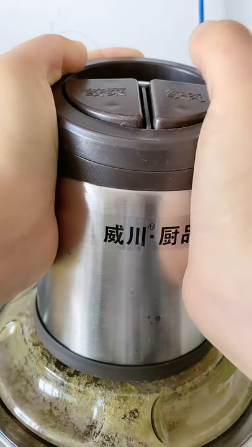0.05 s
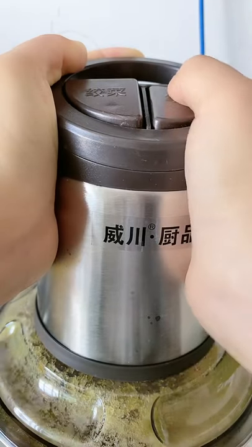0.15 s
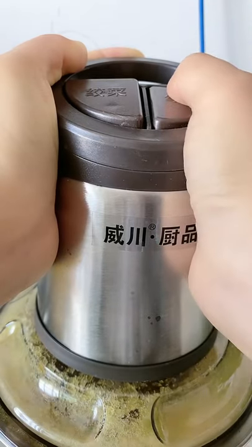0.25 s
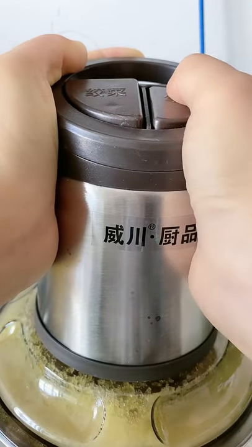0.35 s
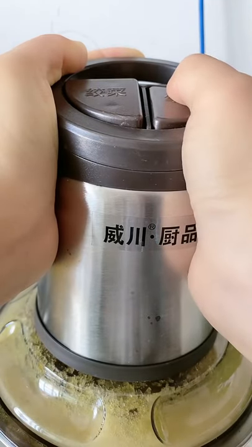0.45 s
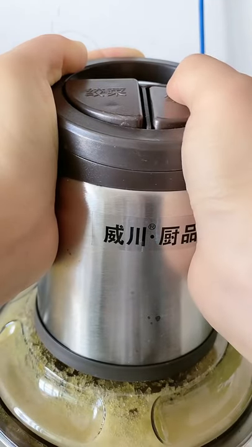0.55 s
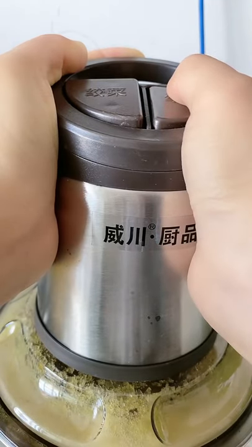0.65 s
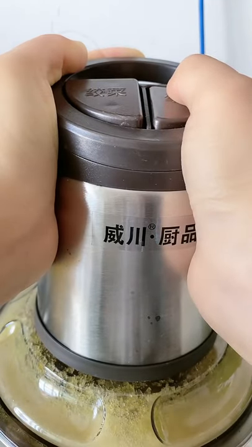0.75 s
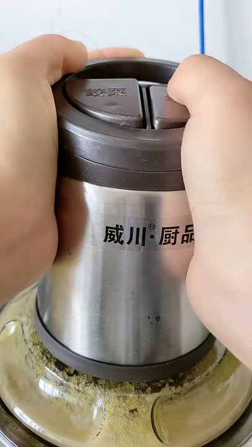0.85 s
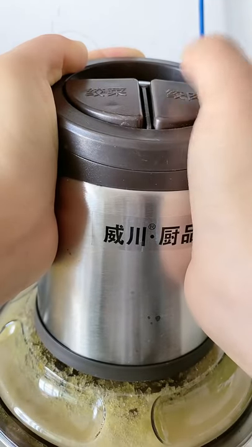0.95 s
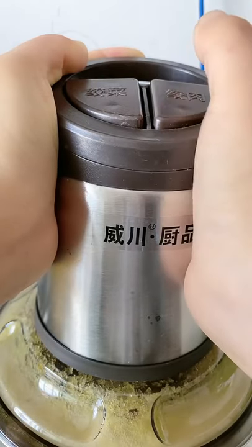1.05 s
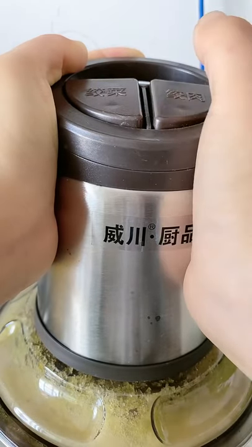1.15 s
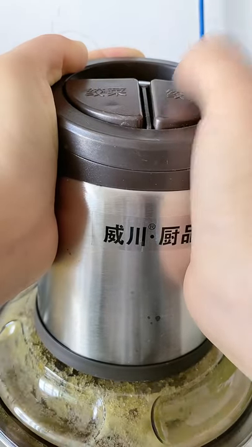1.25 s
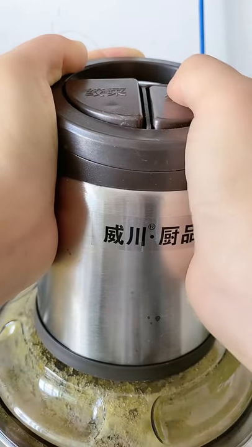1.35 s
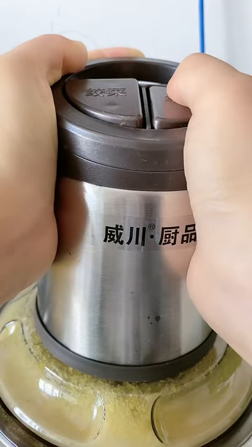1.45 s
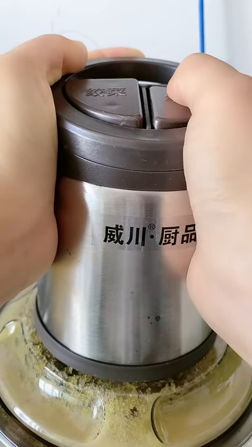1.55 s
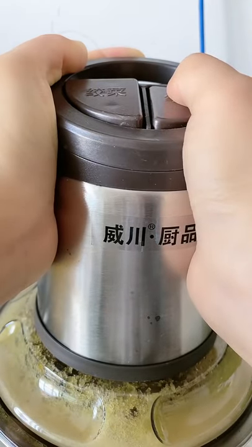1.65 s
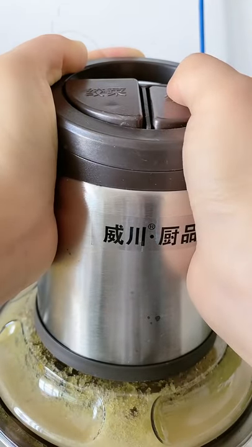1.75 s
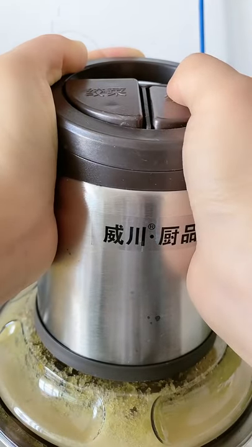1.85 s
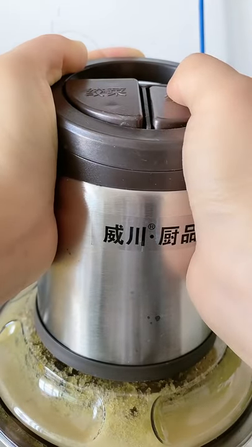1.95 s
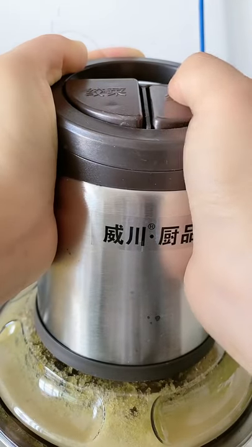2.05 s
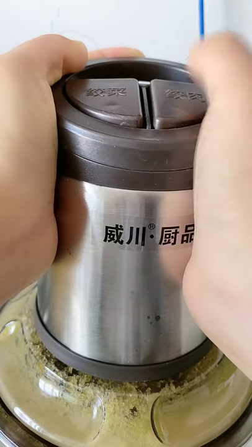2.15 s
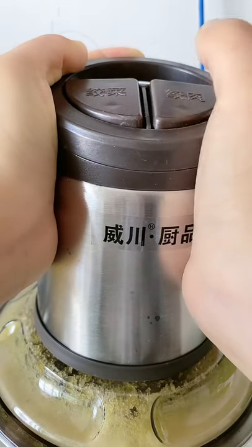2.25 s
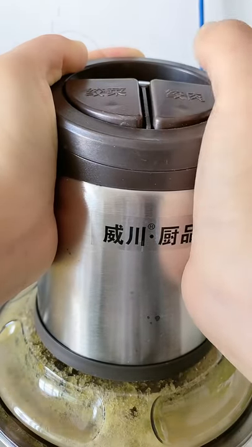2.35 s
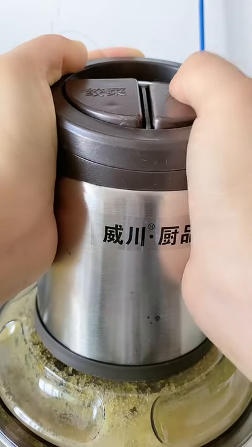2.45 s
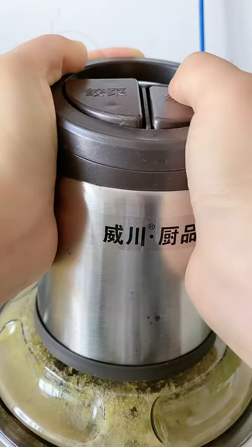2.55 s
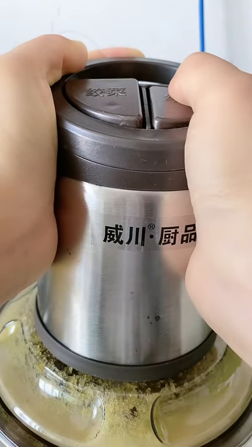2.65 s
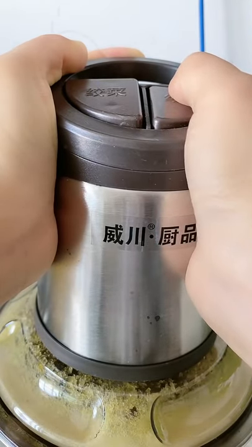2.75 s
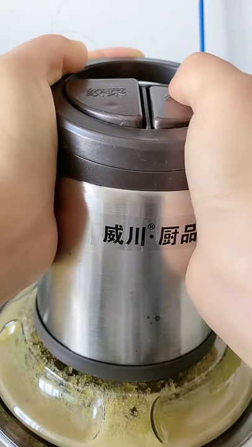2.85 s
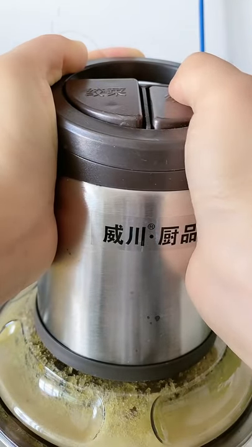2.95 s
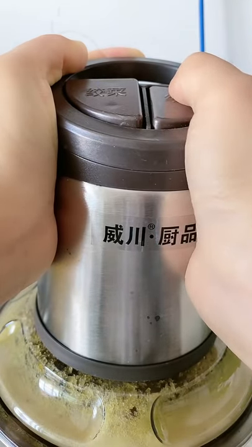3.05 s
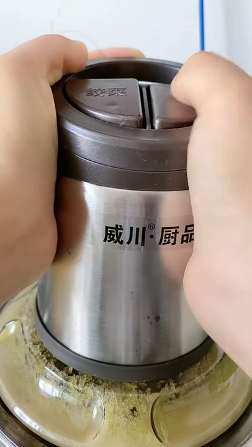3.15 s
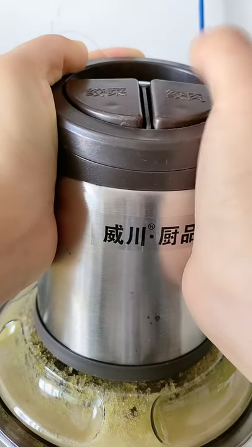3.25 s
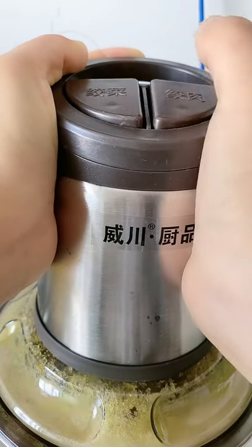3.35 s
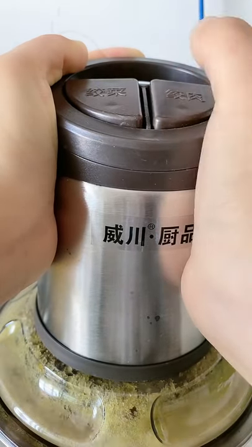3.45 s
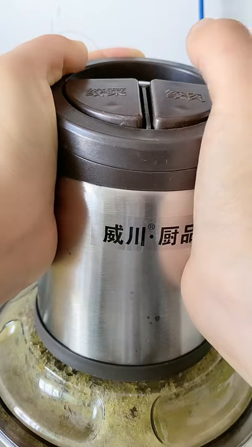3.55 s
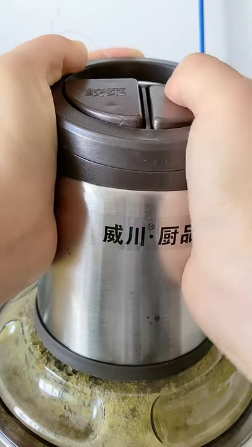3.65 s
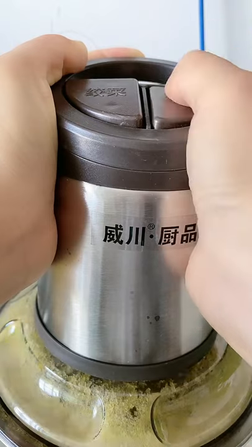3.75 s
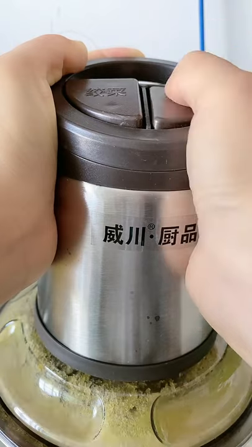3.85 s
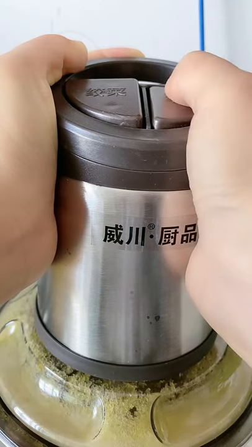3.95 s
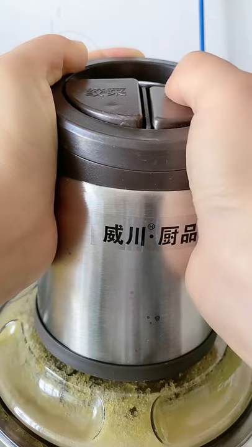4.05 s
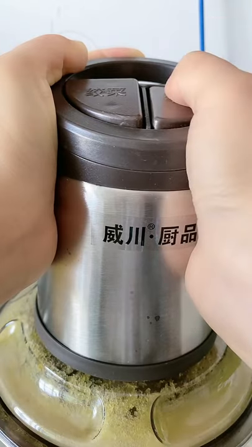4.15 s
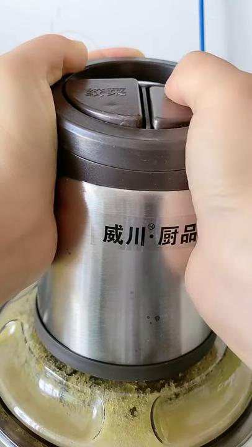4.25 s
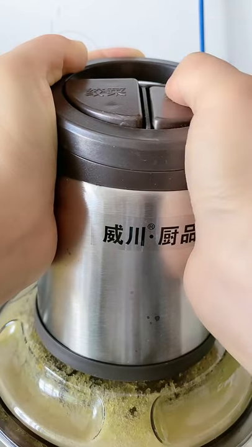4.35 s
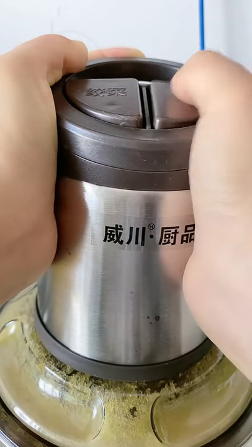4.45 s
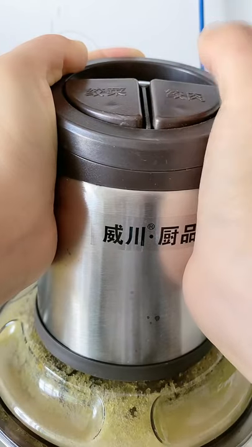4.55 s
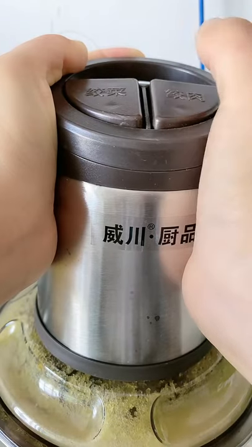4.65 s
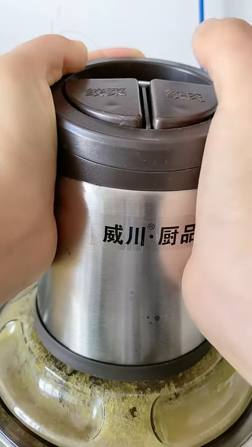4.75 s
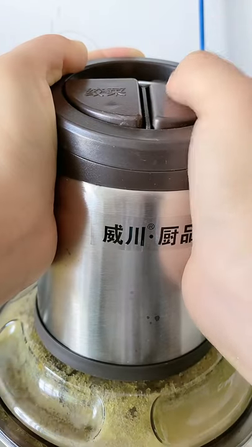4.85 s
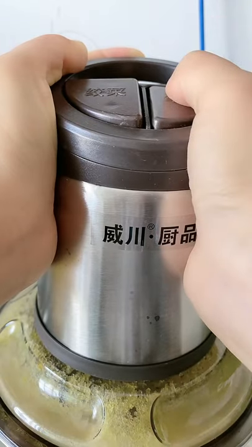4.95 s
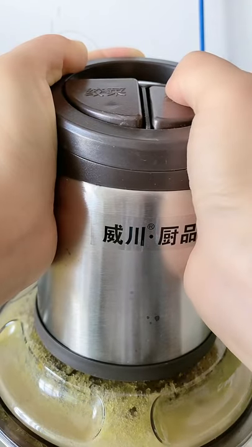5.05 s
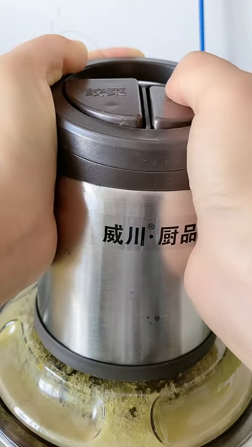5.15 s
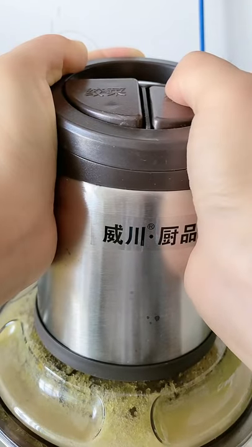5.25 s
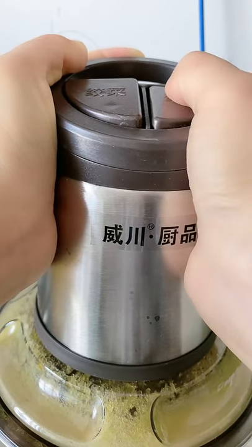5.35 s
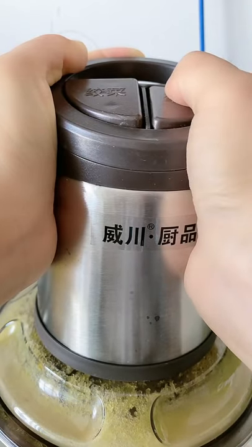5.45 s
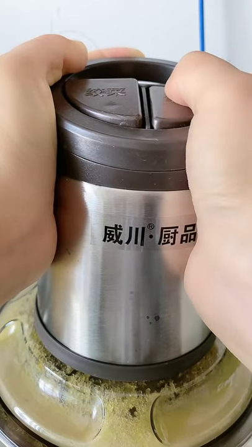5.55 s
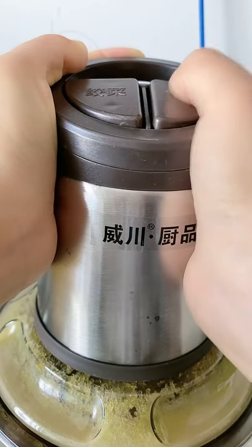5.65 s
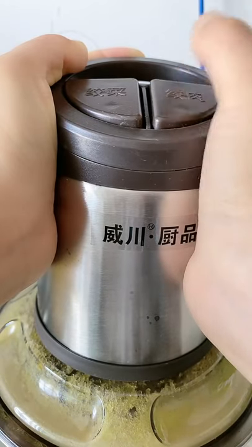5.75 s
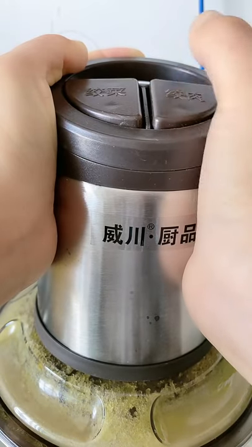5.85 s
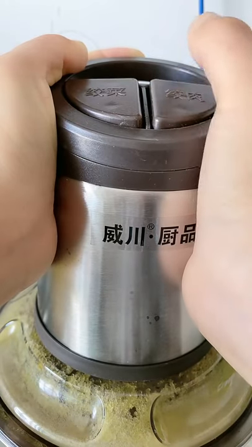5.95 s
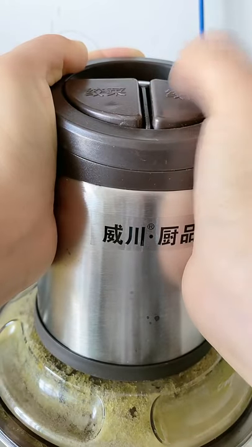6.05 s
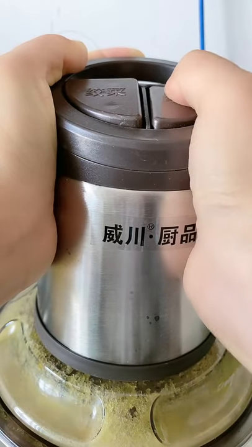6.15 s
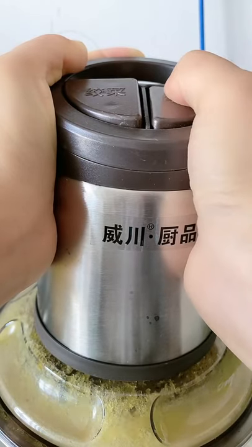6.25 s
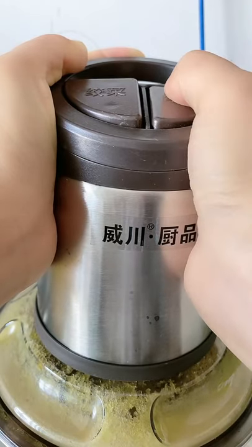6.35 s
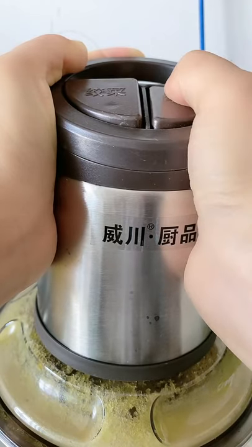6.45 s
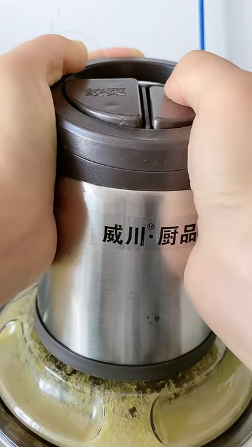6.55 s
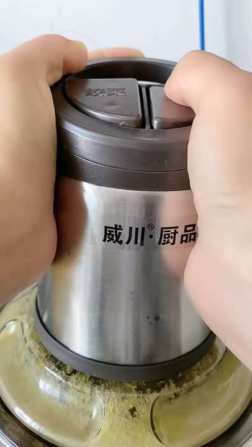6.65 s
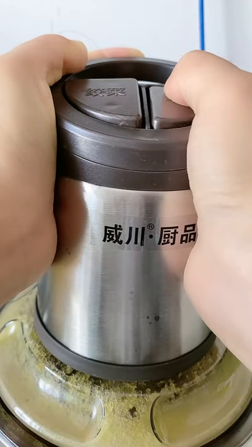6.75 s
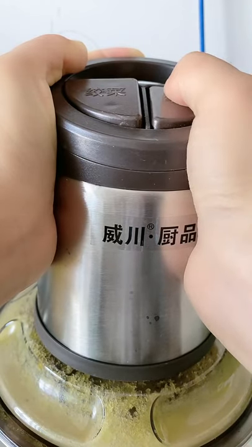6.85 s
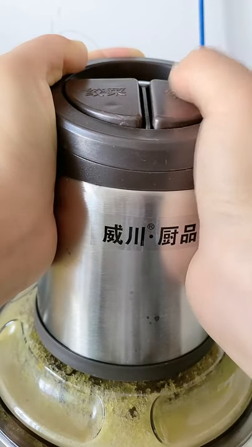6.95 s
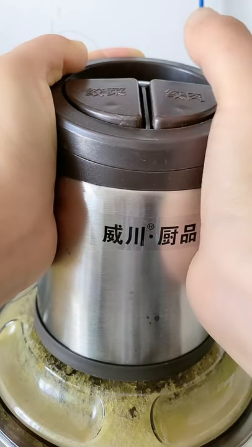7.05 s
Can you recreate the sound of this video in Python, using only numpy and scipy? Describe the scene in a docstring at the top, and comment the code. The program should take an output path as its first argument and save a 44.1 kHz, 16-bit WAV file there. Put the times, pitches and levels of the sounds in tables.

```python
"""An electric chopper crushes hard, brittle pieces in its glass bowl on a kitchen counter.
It is first heard coasting from an earlier press, then pulsed six times, each a run-up and a coast.
The unbalanced rotor shakes at shaft speed, gear tones excite shell resonances and random thumps excite the body.
Filtered random grains make chips rattle the lid and hiss on the glass, densest at speed.
During and after the presses, clicks with dying noise make the jolts, the cracks of larger pieces and the knocks."""
import sys
import numpy as np
from scipy import signal
from scipy.fft import rfft, irfft
from scipy.io import wavfile
from scipy.ndimage import uniform_filter1d

SR = 44100
rng = np.random.default_rng(int(sys.argv[2]) if len(sys.argv) > 2 else 0)


def int16_out(signal):
    """Quantize to a 16-bit WAV file."""
    q = np.round(np.clip(np.atleast_2d(signal).T, -1, 1) * 32767)
    wavfile.write(sys.argv[1], SR, q.astype(np.int16))


N = 313551
T = np.arange(N) / SR

# button held: (on [s], off [s], speed aimed at by the release [turns/s], time constant of the coast [s])
PRESSES = [(.211, .98, 333, .282), (1.37, 2.19, 342, .291), (2.524, 3.275, 343, .337),
           (3.722, 4.567, 348, .318), (4.932, 5.74, 359, .411), (6.174, 7.03, 362, .42)]
# spectrum of the glass under the chips: (frequency [Hz], level [dB])
GLASS = [(800, -35), (2300, -20), (3300, -12), (4200, -7), (4900, -0.5), (5650, 5.5), (6300, 2.5),
         (7200, 1), (8300, -7), (9700, -20), (11500, -14), (13600, -19), (14200, -48), (16000, -45)]
SLACK_S = .02   # the rotor runs free this long before the gears catch


def from_db(db):
    """Level to amplitude: 20 dB is a factor of ten."""
    return 10 ** (np.asarray(db) / 20)


def rms_one(x):
    """Normalization: equal mean power for every signal, an rms of 1."""
    return x / np.sqrt(np.mean(x ** 2) + 1e-20)


def drift(rate):
    """Low-pass noise: a random curve of rms 1 whose spectrum falls off above rate [Hz]."""
    hz = np.arange(N // 2 + 1) * SR / N
    spectrum = rfft(rng.standard_normal(N)) / (1 + (hz / rate) ** 2)
    return rms_one(irfft(spectrum, N))


def turns(hz):
    """Phase [rad] is the running integral of the rate of rotation."""
    return 2 * np.pi * np.cumsum(hz) / SR


def response(spectrum, size=2048):
    """Minimum phase: folding the cepstrum gives the causal click response of a surface with this spectrum."""
    hz, db = np.transpose(spectrum)
    grid = np.maximum(np.arange(size // 2 + 1) * SR / size, 1)
    log_gain = np.log(from_db(np.interp(np.log(grid), np.log(hz), db)))
    cepstrum = irfft(log_gain)
    cepstrum[1:size // 2] *= 2
    cepstrum[size // 2 + 1:] = 0
    return irfft(np.exp(rfft(cepstrum)))


def through(x, impulse):
    """Linear filtering: convolution with an impulse response."""
    return signal.fftconvolve(x, impulse)[:N]


def resonate(x, modes):
    """Modal superposition: parallel two-pole resonances, each with its own gain at the peak."""
    out = 0
    for hz, width, db in modes:
        r = np.exp(-np.pi * width / SR)
        zeros = np.array([1, 0, -1]) * (1 - r * r) / 2
        poles = [1, -2 * r * np.cos(2 * np.pi * hz / SR), r * r]
        out = out + from_db(db) * signal.lfilter(zeros, poles, x)
    return out


def grains(per_s, spread_db):
    """Shot noise: random impacts of either sign, their levels spread exponentially up to 4 * spread_db."""
    sizes = from_db(spread_db * np.minimum(rng.exponential(1, N), 4))
    signs = rng.choice([-1, 1], N)
    hits = rng.random(N) < per_s / SR
    return sizes * signs * hits / np.sqrt(per_s)   # mean power independent of the rate


def blows(rows, crumble_db, size=4096):
    """Impulsive excitation: each (time [s], level [dB], decay [s]) is a click and a dying spray of noise."""
    out, age = np.zeros(N + size), np.arange(size) / SR
    for s, db, crumble_s in rows:
        burst = from_db(crumble_db) * rng.standard_normal(size) * np.exp(-age / crumble_s)
        burst[0] = 1
        at = max(round(s * SR), 0)
        out[at:at + size] += from_db(db) * burst
    return out[:N]


def by_press(values):
    """Piecewise-constant control: hold one value through each press and the coast after it."""
    starts = [on for on, *_ in PRESSES]
    return np.asarray(values)[np.maximum(np.searchsorted(starts, T) - 1, 0)]


def coast(hz, coast_s, age):
    """Rotor deceleration: viscous drag decays the speed exponentially, dry friction brings it to rest."""
    friction_hz = 79   # below this speed dry friction brakes more than drag does
    slowing = (hz + friction_hz) * np.exp(-np.maximum(age, 0) / coast_s)
    return np.maximum(slowing - friction_hz, 0)


def shaft_speed():
    """First-order run-up: each press pulls the rotor towards a slowly rising speed; on release it coasts."""
    spin_up_s = .113   # time constant of the run-up
    creep_hz_per_s = 20   # the motor gains speed as the load breaks up
    speed = coast(104.17, .27, T)   # still coasting from an earlier press
    for on, off, top_hz, coast_s, *_ in PRESSES:
        driven = np.clip(T, on, off)
        goal = top_hz - creep_hz_per_s * (off - driven)
        initial_hz = np.interp(on, T, speed)
        running = goal + (initial_hz - goal) * np.exp(-(driven - on) / spin_up_s)
        speed = np.where(T > on, coast(running, coast_s, T - off), speed)
    return speed


def engaged():
    """Gear coupling: 1 while the motor drives the blade, 0 while it coasts, with short ramps between."""
    driving = sum(1. * ((T > on + SLACK_S) & (T < off)) for on, off, *_ in PRESSES)
    return uniform_filter1d(driving, size=400)


def load_levels(speed, held, surge_db):
    """Load response: rumble follows speed; chips fly once the blade is driven, hardest while the motor labours."""
    # load at each pace of stirring, relative levels:
    # (speed [turns/s], rumble [dB], rattle [dB], hiss of fine chips [dB])
    load = [(10, -44, -62, -45), (30.6, -41, -44.5, -34.5), (58, -31, -41.5, -32.5), (93, -31, -31, -26),
            (126, -26.5, -30.5, -24), (220, -25.5, -28.5, -24), (324, -25, -27.5, -22.5)]
    # rises and sudden dips of the hiss: (time [s], level change [dB])
    hiss_change = [(.3, 0.5), (1.0, 2), (1.4, -1.5), (1.75, 1), (2.3, 1), (2.62, 1), (2.75, -2), (2.9, 0.5),
                   (3.82, -1.5), (3.89, -4), (4.1, 0), (4.7, 1), (5.3, -1), (5.63, 0.5), (5.7, -1.5),
                   (6.25, -3), (6.7, 1.5), (6.8, -4)]
    sway_per_s = 9.2   # the heap shifts at random
    pace, rumble_db, rattle_db, hiss_db = np.transpose(load)
    effort = held * np.clip(1 - speed / pace[-1], 0, 1)
    stir = speed + effort * pace[-1]
    surge = surge_db * effort
    change_db = np.interp(T, *np.transpose(hiss_change))
    shift = drift(sway_per_s)
    rumble_level = np.interp(speed, pace, rumble_db) + 1.0 * drift(sway_per_s)
    # the coarse chips share part of the surge of the fine ones
    rattle_level = np.interp(stir, pace, rattle_db) + 0.42 * surge + 0.2 * shift
    hiss_level = np.interp(stir, pace, hiss_db) + surge + 1.02 * shift + change_db
    return rumble_level, rattle_level, hiss_level


def motor(speed, held, rotor_db, sweep_db):
    """Rotating unbalance shakes the housing once a turn, two blades sweep the load, windings hum under current."""
    # shake of the unbalanced rotor, before the change for each press: (speed [turns/s], level [dB])
    unbalance = [(100, -65), (260, -38), (298, -31.5), (325, -29.5), (341, -26.8), (350, -22), (361, -18)]
    shake_db = np.interp(speed, *np.transpose(unbalance)) + rotor_db
    shake = from_db(shake_db + .7 * drift(12))
    rotor = shake * np.sin(turns(speed * (1 + .002 * drift(15))))
    mains = turns(np.full(N, 50.))
    hum = held * from_db(-44 + 2 * drift(5)) * np.sin(2 * mains)
    # the gearbox turns the blades seven times slower than the rotor
    blade = turns(speed / 7)
    strokes = from_db(sweep_db) * np.sin(2 * blade) + from_db(-28) * np.sin(blade)
    sweep = shake * from_db(1.7 * drift(5)) * strokes
    return np.sqrt(2) * (rotor + hum + sweep)   # sines: rms to peak


def gears(speed, whine_db):
    """Gear-mesh excitation: tones tied to a stumbling shaft flare as they cross each shell resonance."""
    # mesh, its sidebands from the planet carrier, the sun's teeth:
    # (multiple of the shaft speed [1], relative level [dB])
    gear_tones = [(8.57, 0), (8.14, -9), (8.43, -8), (8.71, -10), (9.0, -10), (10.0, -13)]
    # gearbox shell: (frequency [Hz], width [Hz], level [dB])
    shell_modes = [(1086, 165, -1.5), (1897, 210, -2.5), (2637, 52, -0.5), (2810, 220, -4), (3360, 120, -3)]
    shaft = turns(speed * (1 + .005 * drift(60)))
    teeth = 0
    for order, db in gear_tones:
        tone = np.sin(order * shaft + rng.uniform(0, 2 * np.pi))
        teeth = teeth + from_db(db + 2.0 * drift(130)) * tone
    # loose teeth chatter, which smears the mesh tone into a band
    chatter = from_db(-0.5) * drift(240) * np.sin(gear_tones[0][0] * shaft)
    force = (teeth + chatter) * np.clip(speed / 170, 0, 1) ** 2 * from_db(whine_db)
    # the shell's panels swing with or against each other
    signs = [1, -1, 1, -1, -1]
    return sum(sign * resonate(force, [mode]) for sign, mode in zip(signs, shell_modes))


def rumble(level_db):
    """Random excitation of modes: the tumbling load thumps the housing and counter."""
    # housing and counter: (frequency [Hz], width [Hz], relative level [dB])
    body_modes = [(106.3, 10, -11), (151, 26, -12.5), (181.1, 19.6, 5), (202, 45, -7.5), (301.5, 55, -1.5),
                  (359.3, 11.8, 2.5), (399, 6.1, -15)]
    thumps = resonate(grains(900, spread_db=0.5), body_modes)
    edges = signal.butter(4, [90, 440], "band", fs=SR, output="sos")
    return from_db(level_db + 1.62) * rms_one(signal.sosfilt(edges, thumps))


def chips(speed, rattle_db, hiss_db):
    """Filtered shot noise: coarse chips rattle the lid, fine ones hiss on glass, in clumps, more often at speed."""
    # spectrum of lid and bowl under the rattle: (frequency [Hz], relative level [dB])
    rattle_spectrum = [(60, -22), (300, -18.5), (620, 2.5), (780, -3.5), (1100, 2.5), (1550, -0.5),
                       (1700, -2.5), (1850, 3.5), (2050, -5), (2400, -5), (2750, -3.5), (3300, -7),
                       (4500, -7.5), (9000, -64)]
    per_s = 1200 + 16 * speed
    clumps = drift(133)
    coarse_hits = grains(per_s * .5, spread_db=0.5) * from_db(1.6 * clumps)
    coarse = rms_one(through(coarse_hits, response(rattle_spectrum)))
    fine = 0
    for tilt_db in (-4, 0, 4):   # per octave: big, middling and small chips, from dull to bright
        colour = [(hz, db + tilt_db * np.log2(hz / 6500)) for hz, db in GLASS]
        fine_hits = grains(per_s * .4, spread_db=0.0) * from_db(2.2 * clumps)
        fine = fine + rms_one(through(fine_hits, response(colour)))
    return from_db(rattle_db - 1.5) * coarse + from_db(hiss_db - 1.53) * rms_one(fine)


def air():
    """Stationary coloured noise: the steady sound of the room air."""
    # spectrum of the room air: (frequency [Hz], relative level [dB])
    air_spectrum = [(20, -37), (45, -0.5), (100, -7), (200, -28), (500, -13), (2000, -15.5), (15000, -19.5)]
    return from_db(-44.5) * rms_one(through(rng.standard_normal(N), response(air_spectrum)))


def impacts(jolt_db):
    """Impulse response: jolts and knocks ring the gearbox and lid; cracks ring the glass, muffled by the load."""
    # larger pieces cracking: (time [s], relative level [dB], decay of the splinters [s])
    crack_rows = [(.236, -6, 0.0066), (.246, -5, 0.003), (.965, -7.5, 0.0017), (1.069, -5, 0.0035),
                  (1.406, -9, .005), (1.628, -6.5, 0.0016), (1.766, -4, .0015), (1.987, -3.5, .0018),
                  (2.068, -3, 0.0019), (2.4287, -2, 0.0023), (2.544, -13, 0.0087), (2.668, -6.5, 0.0023),
                  (3.07, -4, .002), (3.172, -1.5, 0.001), (3.53, -9, 0.0033), (3.743, -5, 0.0026),
                  (3.747, -1.5, 0.0049), (3.798, -7, 0.0041), (3.8535, -4, 0.0014), (3.989, -7, 0.0047),
                  (4.429, -4, .001), (4.828, -7.5, 0.0045), (4.865, -6.5, 0.0034), (5.64, -7, .003),
                  (6.033, -5.5, 0.0055), (6.193, -9.5, 0.0044), (6.746, -4.5, 0.0023)]
    # the blade knocks on lumps: (time [s], relative level [dB])
    knock_rows = [(0.237, -15), (0.268, 0), (0.279, -10), (1.405, 0.5), (1.472, -1), (3.75, -3),
                  (4.831, -5.5), (4.952, -22), (5.87, -4), (6.045, -3)]
    # lid when struck: (frequency [Hz], width [Hz], level [dB])
    lid_modes = [(886, 450, 0), (1080, 120, 1.5), (1690, 78, -22)]
    jolt_s, knock_s = 0.026, 0.0021   # decay of the chatter
    jolt_rows = [(on + SLACK_S, db, jolt_s) for (on, *_), db in zip(PRESSES, jolt_db)]
    jolts = blows(jolt_rows, crumble_db=-6)
    knocks = blows([(s, db, knock_s) for s, db in knock_rows], crumble_db=-11)
    # the load damps the treble of a crack
    muffle = signal.butter(1, 3530, fs=SR, output="sos")
    glass = signal.sosfilt(muffle, response(GLASS))
    cracks = through(blows(crack_rows, crumble_db=-9.5), glass / np.abs(glass).max())
    return from_db(-2.5) * cracks + resonate(from_db(7.5) * jolts + from_db(12.5) * knocks, lid_modes)


def kitchen():
    """Diffuse reverberation: dense reflections from tiles and counter, dying exponentially."""
    t60_s = 0.21   # time to fall by 60 dB
    age = T[:SR // 2]
    tail = rng.standard_normal(len(age)) * from_db(-60 * age / t60_s) * (age > .003)
    tail = signal.sosfilt(signal.butter(2, 500, "high", fs=SR, output="sos"), tail)
    return tail / np.sqrt(np.sum(tail ** 2))


def scene():
    """Superposition: the direct sound of the chopper, a little reverberation and the room air."""
    # how the load answers each press, as relative levels or changes of level:
    # (starting jolt [dB], surge of chips [dB], rumble [dB], rotor shake [dB], blade sweep [dB],
    #  gear whine [dB], change of the whine while coasting [dB])
    force = [(-11, 1, -1.5, -0.5, -20, -25, -8), (-20, 4, -0.5, -1, -19, -24, -6),
             (-36, 5, 0, 0.5, -19, -23.5, -3.5), (-17, 4.5, 0.5, 1.5, -13.5, -23, -2),
             (-15.5, 6.5, 0.5, 1, -13.5, -22.5, -4), (-25, 12, .5, 0.5, -14.5, -22.5, -1.5)]
    speed, held = shaft_speed(), engaged()
    jolt_db, *columns = np.transpose(force)
    surge_db, heap_db, rotor_db, sweep_db, whine_db, coasting_db = map(by_press, columns)
    rumble_db, rattle_db, hiss_db = load_levels(speed, held, surge_db)
    drive = motor(speed, held, rotor_db, sweep_db) + gears(speed, whine_db + coasting_db * (1 - held))
    load = rumble(rumble_db + heap_db) + chips(speed, rattle_db, hiss_db)
    chopper = drive + load + impacts(jolt_db)
    reverberation = from_db(-11) * through(chopper, kitchen())
    return (chopper + reverberation + air())[None]


def record(dry):
    """Clipping and band limiting: the highest peaks overload and the top is cut."""
    cutoff_hz = 15900
    low_pass = signal.ellip(12, .1, 90, cutoff_hz, fs=SR, output="sos")
    return signal.sosfilt(low_pass, np.clip(dry, -1, 1))


dry = scene()
out = record(dry)
int16_out(out)
```